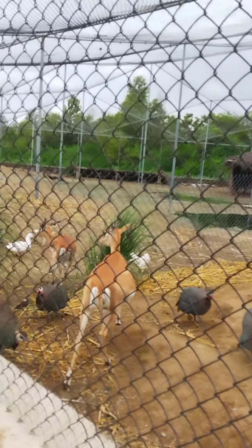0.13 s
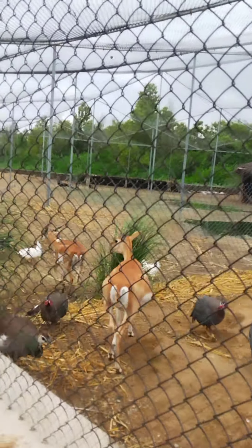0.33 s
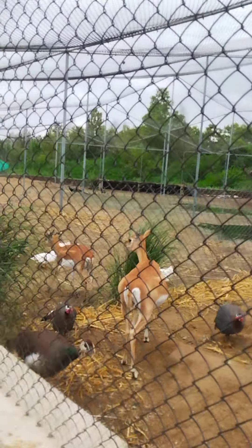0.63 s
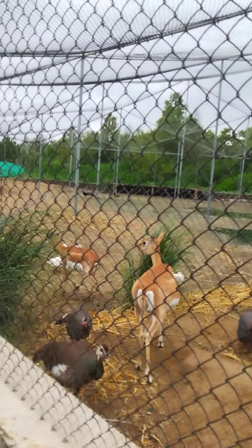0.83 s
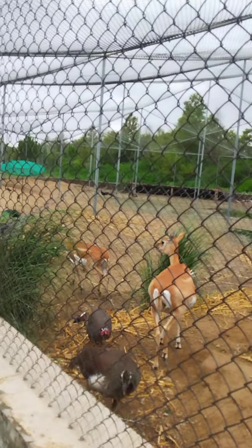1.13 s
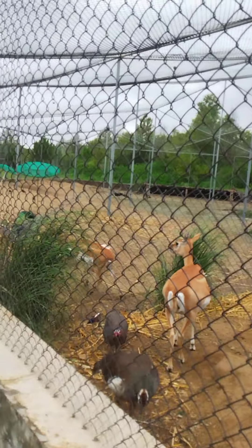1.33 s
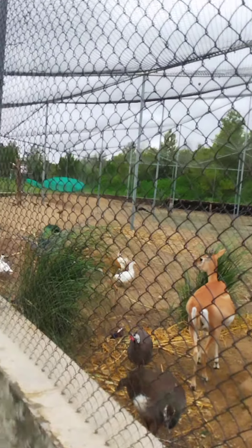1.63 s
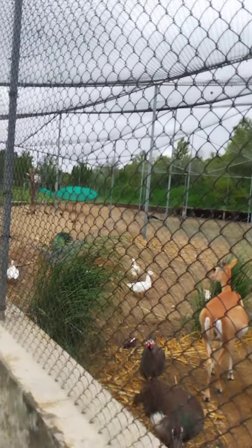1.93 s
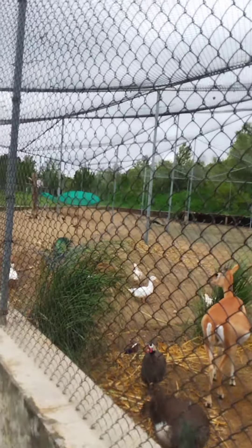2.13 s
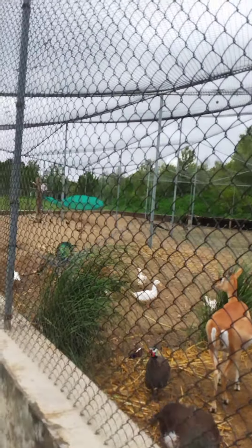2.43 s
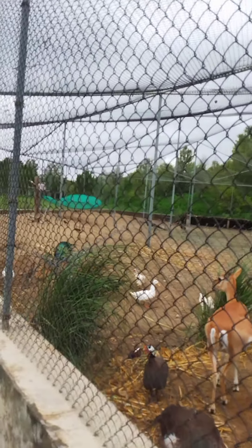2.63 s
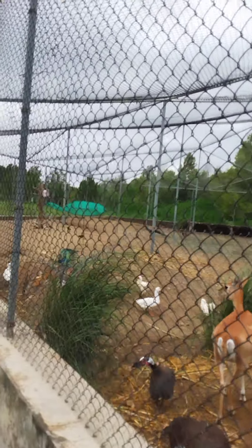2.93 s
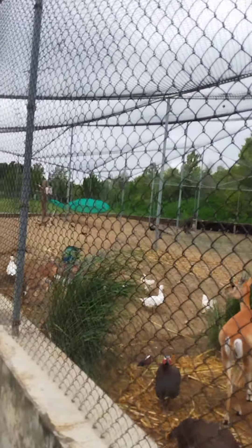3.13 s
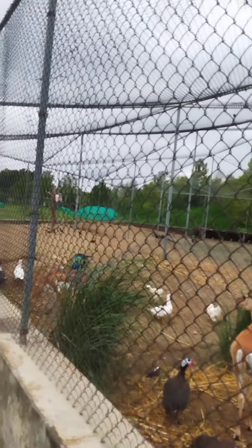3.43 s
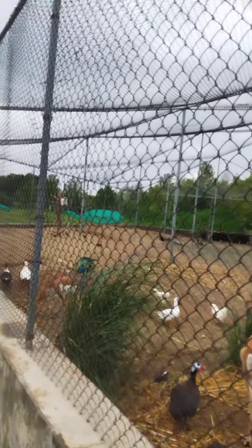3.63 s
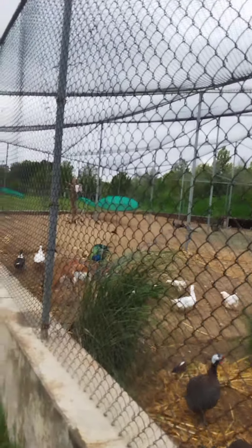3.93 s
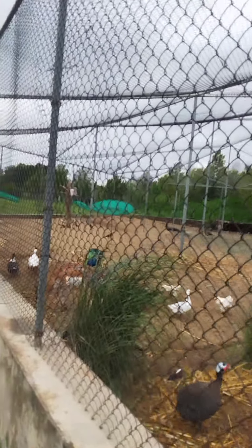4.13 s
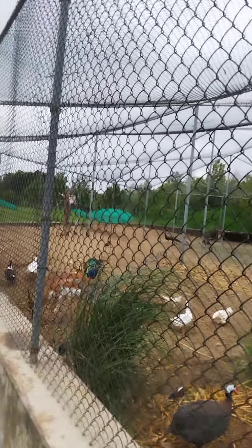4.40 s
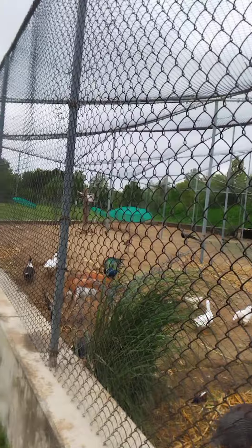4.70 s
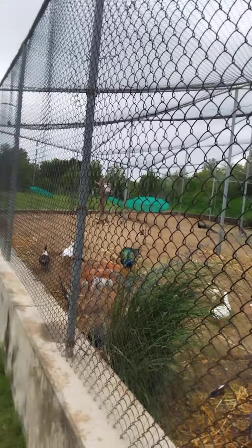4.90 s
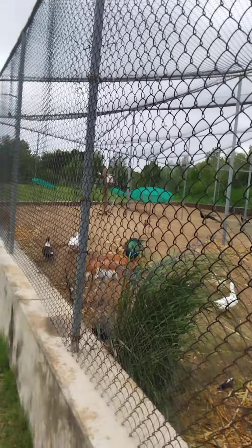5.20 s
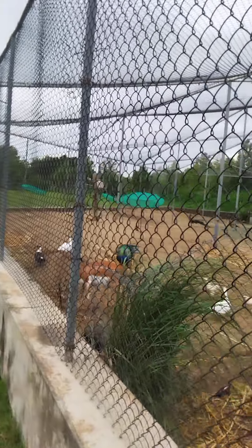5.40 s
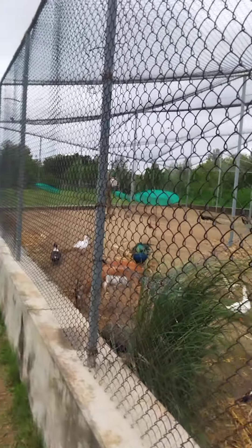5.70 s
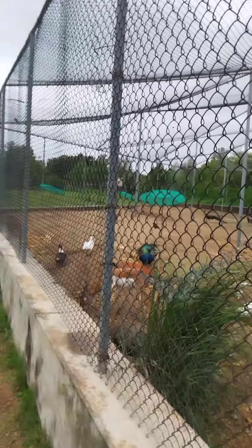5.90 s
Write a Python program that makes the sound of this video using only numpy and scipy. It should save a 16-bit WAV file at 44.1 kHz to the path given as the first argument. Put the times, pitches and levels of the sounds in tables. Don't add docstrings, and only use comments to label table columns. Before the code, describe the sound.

Close guineafowl make short, dry, metallic clucks, sparse at first and clustered after three seconds; from about 4.4 a higher bird rattles evenly, roughly ten notes a second. Wind bumps and flutters separately at the left and right of a handheld microphone throughout, heaviest midway. Faint behind are sliding bird whistles, two duck rasps, one goose honk, a straw rustle and leaf hiss, with a thin open-air echo.

```python
import sys
import numpy as np
from scipy import signal
from scipy.fft import rfft, irfft
from scipy.io import wavfile

SR = 44100
rng = np.random.default_rng(int(sys.argv[2]) if len(sys.argv) > 2 else 0)


def elevation(decibels):
    levels = np.asarray(decibels, float)
    return 10 ** (levels / 20)


def output_pcm(signal):
    pcm = np.clip(np.atleast_2d(signal).T, -1, 1) * 32767
    wavfile.write(sys.argv[1], SR, np.round(pcm).astype(np.int16))


N = 266937

SECOND_HZ = 1094.5
LEAD = .03


def evened(x):
    return x / np.sqrt(np.mean(x ** 2) + 1e-20)


def read(points, hz):
    f, value = np.transpose(points)
    return np.interp(np.log(hz + 1), np.log(f + 1), value)


def columns(rows, t):
    s, *values = np.transpose(rows)
    return np.array([np.interp(t, s, v) for v in values])


def add(mix, s, sound):
    part = mix[..., round(s * SR):][..., :sound.shape[-1]]
    part += sound[..., :part.shape[-1]]


def coloured(x, spectrum):
    size = x.shape[-1]
    return irfft(rfft(x) * elevation(read(spectrum, np.fft.rfftfreq(size, 1 / SR))), size)


def wander(shape, hz):
    pole = np.exp(-2 * np.pi * hz / SR)
    x = rng.standard_normal(shape)
    return evened(signal.lfilter([1], np.convolve([1, -pole], [1, -pole]), x))


def stack(turns, count):
    return evened(np.cos(2 * np.pi * np.arange(1, count + 1)[:, None] * turns).sum(0))


def gusts(rows):
    rise_db_per_s, fall_db_per_s, flutter_steeper, lull_db = 392, 226, 3.4, -63
    t = np.arange(0, N + 64, 64) / SR
    s, length, rumble_db, flutter_db = np.transpose(rows)[:, :, None]
    off_db = rise_db_per_s * np.maximum(s - t, 0) + fall_db_per_s * np.maximum(t - s - length, 0)
    both = elevation([rumble_db - off_db, flutter_db - flutter_steeper * off_db]).max(1)
    both = both + elevation([[lull_db], [lull_db - 31]])
    return np.array([np.interp(np.arange(N) / SR, t, g) for g in both])


def eddy(hz, sharp):
    t = np.arange(1500) / SR
    v = (t - .010) * hz * 2 * np.pi
    slap = (1 - 0.017 * v ** 2) * np.exp(-v ** 2 / 2)
    point = .1 * sharp * np.exp(-5.5 * abs(v))
    ragged = np.gradient(wander(len(t), hz=0.12 * hz))
    steep = signal.butter(3, 2 * hz, fs=SR)
    ragged = evened(signal.lfilter(*steep, ragged))
    flutter = 0.13 * ragged * np.exp(-abs(t - .012) / 0.023)
    return (slap + point + flutter) * signal.windows.tukey(len(t), .2)


def wind():
    # (start [s], length [s], rumble [dB], flutter [dB])
    gusts_left = [(0.0, 0.12, -21, -38), (.27, 0.059, -18.5, -41), (.66, 0.11, -24, -35),
                  (1.0, 0.11, -20, -36), (1.17, 0.29, -17.5, -34.5), (1.56, 0.049, -25.5, -34),
                  (1.8, 0.028, -33, -63), (1.93, 0.1, -31, -70), (2.16, 0.025, -20, -59),
                  (2.36, 0.058, -22, -58), (2.6, 0.18, -24.5, -51), (2.92, 0.023, -26, -63),
                  (3.14, 0.14, -24, -33), (3.38, 0.19, -24, -48), (3.72, 0.22, -18.5, -24),
                  (3.95, 0.422, -16, -16.5), (4.56, 0.14, -26.5, -46), (4.77, 0.098, -21.5, -35.5),
                  (5.08, 0.1, -25, -41), (5.3, 0.027, -30.5, -45), (5.48, 0.048, -34.5, -50),
                  (5.72, 0.04, -25, -37), (5.86, 0.035, -36.5, -58)]
    gusts_right = [(0.0, 0.037, -36, -48), (.17, 0.1, -22.5, -41), (.34, 0.12, -29.5, -50),
                   (.55, 0.099, -14.5, -27.5), (.8, 0.055, -18.5, -39), (.9, 0.1, -21, -33),
                   (1.3, 0.29, -17, -28), (1.56, 0.27, -20, -21.5), (1.85, .28, -20.5, -25.5),
                   (2.16, 0.45, -22, -22.5), (2.47, 0.13, -17.5, -24), (2.7, 0.31, -15.5, -31),
                   (2.92, 0.31, -13.5, -21), (3.1, 0.24, -13, -21), (3.5, 0.53, -19, -24),
                   (3.9, .3, -26, -39), (4.4, 0.1, -15.5, -22), (4.52, .3, -19, -35.5),
                   (5.05, 0.068, -25.5, -36.5), (5.25, 0.023, -29.5, -55), (5.36, 0.043, -22.5, -30),
                   (5.46, 0.31, -24.5, -39), (5.62, 0.014, -17, -29.5), (5.78, 0.046, -23.5, -43),
                   (5.9, 0.038, -27.5, -49)]
    # (time [s], level [dB], sharpness [0-1])
    pops_left = [(1.072, -19.5, 0.06), (1.266, -23, 0.2), (1.298, -17, 0.26), (1.321, -25, 0.23),
                 (1.397, -21, 0.17), (1.454, -19.5, 0.07), (3.815, -25, 0.7), (3.862, -27, 0.9),
                 (3.878, -13.5, 0.6), (3.918, -16, 0.65), (3.933, -17.5, 0.9), (3.958, -27, 1),
                 (3.981, -11.5, 0.36), (4.017, -20, 1), (4.116, -14, 0.46), (4.178, -23.5, 1),
                 (4.242, -24, 0.95), (4.255, -30, 1), (4.27, -13, 0.78), (4.317, -24.5, 0.88),
                 (4.368, -35, 0.9), (4.745, -20, 0)]
    pops_right = [(0.611, -19.5, 0), (0.863, -24.5, 0.19), (1.514, -22.5, 0.64), (1.566, -45, 0.5),
                  (1.589, -18.5, 0.14), (1.625, -13, 0.1), (1.665, -12.5, 0.41), (1.722, -13.5, 0.31),
                  (1.762, -16, 0.28), (1.807, -24.5, 0.26), (1.874, -26, 0.1), (1.895, -18, 0.7),
                  (1.94, -17.5, 0.26), (1.969, -18.5, 0.47), (2.015, -17.5, 0.3), (2.062, -21, 0),
                  (2.077, -26.5, 0.2), (2.099, -17, 0.54), (2.121, -18.5, 0.04), (2.15, -22.5, 0.28),
                  (2.166, -22.5, 0.28), (2.201, -22, 0.18), (2.268, -22, 0.5), (2.288, -16, 0.4),
                  (2.331, -17, 0.26), (2.452, -17, 0.41), (2.511, -18.5, 0.4), (2.602, -21, 0.2),
                  (2.644, -27, 0), (2.656, -17.5, 0.07), (2.811, -24, 0), (2.87, -20.5, 0),
                  (2.928, -37, 0.06), (2.965, -40, 0.38), (3.012, -16, 0.23), (3.064, -20, 0.53),
                  (3.144, -23, 0.7), (3.166, -18, 0.47), (3.362, -31, 0.2), (3.556, -21, 0.07)]
    # (frequency [Hz], level [dB])
    rumble_spectrum = [(15, -97), (40, -10.5), (95, 3.5), (160, -1.5), (260, -9), (400, -24), (700, -104)]
    # (frequency [Hz], level [dB])
    flutter_spectrum = [(120, -31), (250, 0.5), (450, -6), (800, -21), (1300, -36.5), (2500, -43),
                        (5000, -100)]
    pop_db, dull_hz, sharp_hz, pop_lift_db = 15, 312, 856, 9
    level = np.stack([gusts(gusts_left), gusts(gusts_right)], 1).reshape(4, N)
    lumps = 2 * np.tanh(0.13 * wander((2, N), hz=27.2) + 0.82 * wander((2, N), hz=39.0))
    rumble = evened(coloured(rng.standard_normal((2, N)), rumble_spectrum))
    rumble = evened(rumble * elevation(3.63 * lumps))
    swirl = np.zeros((2, N))
    for port, pops in zip(swirl, (pops_left, pops_right)):
        for s, db, sharp in pops:
            add(port, s - .006, np.hanning(700) * np.clip((db + 38) / 20, 0, 1))
    flutter_db = 3.14 * lumps + 3.05 * wander((2, N), hz=59.5) + pop_lift_db * np.minimum(swirl, 1)
    flutter = evened(coloured(rng.standard_normal((2, N)), flutter_spectrum))
    flutter = evened(flutter * elevation(flutter_db))
    out = elevation(1.4) * rumble * level[:2] + elevation(-2.0) * flutter * level[2:]
    for port, pops in zip(out, (pops_left, pops_right)):
        for s, db, sharp in pops:
            sharp = np.clip(sharp, 0, 1)
            hz = dull_hz + (sharp_hz - dull_hz) * sharp
            add(port, s - .008, elevation(db + pop_db) * rng.choice([-1, 1]) * eddy(hz, sharp))
    return out


def leaves():
    # (frequency [Hz], level [dB])
    leaf_spectrum = [(530, -59), (900, 4), (1720, 6.5), (2790, 0), (4460, 3), (4920, 1), (5820, 2.5),
                     (6720, 5.5), (9770, 3.5), (13500, -9), (16000, -36)]
    # (time [s], level [dB])
    leaves_db = [(0.0, -60), (1.5, -59), (2.81, -56), (3.35, -50.5), (4.3, -60.5), (4.72, -49),
                 (5.5, -51.5), (6.05, -54.5)]
    # (time [s], level [dB])
    rustle = [
        (.62, -70),
        (.72, -48),
        (.85, -55),
        (.95, -51),
    ]
    straw_spectrum = [(1500, -13), (6000, -18), (9000, -9), (11000, -26), (15000, -15), (16500, -58)]
    t = np.arange(N) / SR
    hiss_db = columns(leaves_db, t) + 4.0 + 0.6 * wander(N, hz=19.0)
    hiss = evened(coloured(rng.standard_normal((2, N)), leaf_spectrum)) * elevation(hiss_db)
    straw = evened(coloured(rng.standard_normal((2, N)), straw_spectrum))
    present = (t > rustle[0][0]) * (t < rustle[-1][0])
    return hiss + straw * elevation(columns(rustle, t)) * present


def small_bird():
    start_s, every_s, count = -.004, .0872, 27
    low_hz, high_hz, level_db, fade_db_per_s = 5750, 6050, -54, 1
    out, u = np.zeros(N), np.linspace(0, 1, 1000)
    for k in range(count):
        s = max(start_s + k * every_s, 0)
        hz = high_hz if k % 2 else low_hz
        db = level_db - fade_db_per_s * s + 1.5 * rng.standard_normal()
        glide = hz * (1.05 - 0.081 * u + 0.037 * wander(len(u), hz=400))
        add(out, s, elevation(db) * np.sin(np.pi * u) * np.sin(2 * np.pi * np.cumsum(glide) / SR))
    return out


def syllable(length, db, hz0, hz1, rough, peak, pan_db, treble_db, low_db,
             second_hz=SECOND_HZ, second_db=-25, neck=1.02, whistle_db=-15):
    # (frequency [Hz], level [dB])
    throat = [(410, -74), (700, -32), (1010, -10.5), (1200, -17.5), (2100, -5.5), (2360, -10.5),
              (2630, -0.5), (3470, -4), (5360, -2.5), (6370, -10.5), (10400, -9), (11100, -15.5),
              (13900, -44.5), (15400, -5), (16500, -96)]
    t = np.arange(4096) / SR - LEAD
    u = t / length
    after = np.maximum(t, 0)
    rough = np.clip(rough, .35, 1)
    higher = hz0 > 1685
    jitter = wander((3, len(t)), hz=288)
    sag_hz = (hz1 - hz0) * np.clip(u, 0, 1.2) ** 2.1
    onset_hz = (70 + 160 * (1 - rough)) * np.exp(-after / LEAD * 4)
    turns = np.cumsum((hz0 + sag_hz + onset_hz) * (1 + 0.01904 * rough * jitter[0])) / SR
    second = np.cumsum(second_hz * (1 + 0.013 * jitter[1])) / SR
    main = stack(turns, count=9)
    clear = evened(sum(np.cos(2 * np.pi * k * turns) / (1 + max(k - 2, 0)) ** .8 for k in range(1, 10)))
    beats = evened((main + 0.032) * (0.22 + stack(second, count=4)))
    half = (1 + 3 * higher) * np.cos(np.pi * turns)
    quarter = 1.5 * np.cos(np.pi * turns / 2 + rng.random() * 6)
    skips = evened(main * (half + quarter))
    air = evened(rng.standard_normal(len(t)) * (0.34 + np.exp(-(turns % 1) / 0.41)))
    harsh = evened(0.59 * beats + (0.28 + 0.26 * higher) * skips + (1.9 - 0.1 * higher) * air)
    octave = 0.0093 + .42 * higher * np.exp(-np.maximum(u - .1, 0) / 0.2)
    firm = 0.49 * np.exp(-1.2 * higher * np.maximum(u, 0)) * np.cos(2 * np.pi * turns)
    firm = firm + octave * np.cos(4 * np.pi * turns) + 0.074 * higher * np.cos(2 * np.pi * second)
    peak = np.clip(peak, .15, 1 - .15)
    swell_db = -11 * np.where(u < peak, (peak - u) / peak, (u - peak) / (1 - peak)) ** 2
    edges = np.clip((t + 0.0051 - 0.004 * higher) / 0.0013, 0, 1)
    edges = edges * np.exp(-np.maximum(t - length, 0) / 0.0045)
    shape = elevation(swell_db + 2.6 * rough * wander(len(t), hz=57.6)) * edges
    hz = np.fft.rfftfreq(len(t), 1 / SR)
    rough = rough * (1 - .6 * higher * np.exp(-np.maximum(u, 0) / .25))
    source = (np.clip(1 - rough, 0, 1) ** 1.5 * clear + rough * harsh + firm) * shape
    core = np.exp(-((hz - 3100 * neck) / 1100) ** 4)
    thin = elevation(.6 * swell_db) * (t > .001)
    voice = rfft(source) * core + rfft(source * thin) * (1 - core)
    voice = voice * elevation(read(throat, hz / np.clip(neck, .9, 1.25)))
    voice = voice * (1 - .6 * np.exp(-((hz - 6800) / 250) ** 2))
    rise = np.clip(1 + t / .024, 0, 1)
    whistle = wander(len(t), hz=200) * np.sin(2 * np.pi * np.cumsum(1700 + 2300 * rise) / SR)
    whistle = whistle * rise ** 1.8 * np.exp(-after / 0.001)
    voice_rms = np.sqrt(2 * (abs(voice) ** 2).sum() / len(t) / (length * SR))
    voice = voice + rfft(whistle) * elevation(whistle_db) * voice_rms
    delay = rng.uniform(0, .0025, (2, 5, 1)) * [[0], [1], [1], [1], [1]]
    delay = delay + [[[0]], [[.0013 if higher else .00018]]]
    weight = np.array([[1 / .7], [-.6], [.55], [-.45], [.4]]) * [[[1]], [[-1]]]
    ports = voice * (weight * np.exp(-2j * np.pi * hz * delay)).sum(1)
    power = abs(ports) ** 2
    bands = ((1250, 1900), (2300, 9000), (5000, 11000))
    low, body, high = (power[:, (hz > a) & (hz < b)].sum(1, keepdims=True) for a, b in bands)
    ports = ports * (elevation(low_db) * np.sqrt(body / low)) ** np.clip((2300 - hz) / 400, 0, 1)
    ports = ports * (elevation(treble_db) * np.sqrt(body / high)) ** np.clip((hz - 4200) / 1200, 0, 1)
    ports = ports * elevation((second_db + 25) * np.clip((1350 - hz) / 150, 0, 1))
    ports = ports / np.sqrt(2 * body / len(t) / (length * SR))
    return irfft(ports, len(t)) * elevation(db + pan_db / 2 * np.array([[1], [-1]]))


def guineafowl():
    # (start [s], length [s], level [dB], pitch [Hz], roughness [0-1])
    low_bird = [(0.941, 0.035, -17, 1590, 0.53), (1.156, 0.024, -24.5, 1536, 0.41),
                (1.91, 0.024, -32.5, 1453, 0.55), (2.714, 0.013, -27.5, 1479, 0.2),
                (2.893, 0.031, -35, 1540, 0.6), (3.052, 0.046, -18, 1547, 1),
                (3.176, 0.039, -25, 1600, 0.7), (3.28, 0.06, -20.5, 1597, 0.91),
                (3.307, 0.039, -20.5, 1520, 0.38), (3.422, 0.031, -19, 1638, 0.9),
                (3.473, 0.045, -17.5, 1610, 0.59), (3.593, 0.04, -16.5, 1600, 1.02),
                (3.639, 0.028, -32.5, 1530, 0.7), (3.761, 0.044, -16.5, 1615, 1),
                (4.038, 0.0318, -17.5, 1465, 0.21), (4.201, 0.0089, -32.5, 1370, 0.63),
                (4.387, 0.024, -20, 1477, 0.72), (4.561, 0.022, -34, 1402, 0),
                (4.594, 0.021, -19.5, 1508, 0.76), (4.823, 0.021, -18, 1453, 0.51),
                (5.092, 0.041, -21, 1403, 0.95), (5.892, 0.043, -17, 1555, 0.67)]
    low_bill_db = [-7, -11, -4.5, -1, -8, -6.5, -7, -7, -9.5, -10.5, -8, -11.5, -11, -10.5, -10.5, -14, -9,
                   -2, -9, -7, -11, -5.5]
    low_turn_db = [1, -1, 0, -2, 1.5, -1, 3.5, 8, 5, 16, -3, 4.5, 6, 1, -5, 14, 6.5, 2, -4, 0, 13, 3]
    low_throat = [1.05, 1.05, 1.08, 1.02, 1.05, 1.12, 1.05, 1.08, 1.02, 1.1, 1.03, 1.12, 1.02, 1.06, 1.01,
                  0.95, 1.02, 1.02, 0.79, 1.02, 1.1, 1.03]
    # (start [s], length [s], level [dB], pitch [Hz], place of the peak [0-1])
    high_bird = [(4.008, 0.035, -27.5, 1600, 0.95), (4.367, 0.05, -18, 1745, 0.46),
                 (4.508, 0.04, -17.5, 1727, 0.33), (4.62, 0.041, -16, 1730, 0.63),
                 (4.725, 0.041, -16.5, 1746, 0.58), (4.826, 0.04, -15.5, 1700, 0.64),
                 (4.917, 0.039, -18.5, 1710, 0.56), (5.011, 0.043, -15, 1708, 0.17),
                 (5.106, 0.036, -18.5, 1743, 0.44), (5.192, 0.035, -14, 1709, 0.17),
                 (5.284, 0.036, -15.5, 1759, 0), (5.374, 0.035, -17.5, 1735, 0.25),
                 (5.476, 0.039, -19, 1715, 0), (5.575, 0.045, -21, 1724, 0.26),
                 (5.676, 0.044, -25, 1715, 0.1)]
    # (left minus right [dB], treble [dB], second membrane [dB])
    high_bill = [(-1, -5.5, -40), (0, -4.5, -36), (7, -7.5, -31), (2.5, -7.5, -33), (4.5, -8.5, -34),
                 (2.5, -8.5, -34), (4, -7.5, -27), (2.5, -6, -26), (0.5, -7, -31), (0.5, -7, -29.5),
                 (-0.5, -5.5, -32), (3, -7, -21.5), (4, -4.5, -31), (4.5, -6, -21), (1, -5, -26)]
    # (resonance shift [ratio], whistle [dB])
    high_throat = [(1.038, -19), (1.02, -10), (1.01, -7), (1.05, -26), (0.997, -14), (1.044, -20),
                   (1.08, -28), (1.02, -30), (1.05, -25), (1.025, -27), (1.023, -35), (1.04, -31),
                   (1.016, -30), (1.04, -32), (1.02, -27)]
    # (start [s], length [s], level [dB], pitch [Hz], roughness [0-1])
    clucks = [
        (0.213, 0.02, -52.5, 1440, 0.2),
        (1.976, 0.09, -57.5, 1410, 0.77),
        (2.205, 0.059, -49, 1516, 1),
        (2.377, 0.028, -29, 1762, 0.44),
        (4.475, 0.013, -39.5, 1410, 1.06),
        (5.795, 0.017, -30.5, 1172, .3),
        (0.664, 0.036, -55, 1235, 0.54),
    ]
    # (sag [Hz/s], place of the peak [0-1], left minus right [dB], treble [dB], fundamental [dB])
    cluck_bills = [(8998, 0.9, -5, -35, -8), (4, 0.1, 12, -5, -15), (0, 0, 6, -9, -4),
                   (2000, 0.68, 1.5, -1.5, -8), (0, 0.5, 3, -4, -19), (-32000, 0.4, 5, -11, -24),
                   (600, 0.3, 1, -27, -15)]
    out = np.zeros((2, N))
    end_hz, end_rough_hz, fastest_hz_per_s = 1263, 152, 6000
    for (s, length, db, hz, rough), treble_db, pan_db, neck in zip(low_bird, low_bill_db, low_turn_db, low_throat):
        sag = min((hz - end_hz - end_rough_hz * rough) / length, fastest_hz_per_s)
        low_db = -19.5 + 1.28 * s + 4.5 * (1 - rough)
        voice = syllable(length, db, hz, hz - sag * length, rough, 0.53, pan_db, treble_db, low_db, neck=neck)
        add(out, s - LEAD, voice)
    high_sag, high_rough, high_low_db = 1700, 0.99, -11.5
    for (s, length, db, hz, peak), (pan_db, treble_db, second_db), air in zip(high_bird, high_bill, high_throat):
        second_hz = SECOND_HZ + 170 * (s - 5.6)
        voice = syllable(length, db, hz, hz - high_sag * length, high_rough, peak, pan_db, treble_db,
                         high_low_db, second_hz, second_db, *air)
        add(out, s - LEAD, voice)
    for (s, length, db, hz, rough), (sag, *bill) in zip(clucks, cluck_bills):
        add(out, s - LEAD, syllable(length, db, hz, hz - sag * length, rough, *bill))
    return out


def faint_clucks():
    # (start [s], length [s], level [dB], pitch [Hz], treble [dB])
    faint = [
        (3.043, .005, -40, 1500, 6),
        (3.96, .012, -44, 1300, -20),
        (4.89, .012, -42, 1520, -14),
        (0.72, .02, -52, 1500, -14),
    ]
    out = np.zeros((2, N))
    for s, length, db, hz, treble_db in faint:
        add(out, s - LEAD, syllable(length, db, hz, hz, 0.39, 0.68, 1, treble_db, -1))
    return out


def waterfowl():
    # (time [s], level [dB], pulse rate [Hz])
    rasps = [
        [(1.5, -68, 96.9), (1.6, -54, 102.4), (1.75, -50.5, 114.7), (1.85, -52, 103), (1.92, -69, 103.3)],
        [(2.14, -76, 103), (2.24, -53, 107.8), (2.4, -45.5, 115.7), (2.52, -50.5, 109), (2.64, -67, 102)],
    ]
    # (frequency [Hz], width [Hz], level [dB])
    bill_modes = [(1010, 170, -28), (1480, 300, -1.5), (1784, 260, 2), (2214, 190, -1.5)]
    # (time [s], pitch [Hz], level [dB])
    honk_curve = [
        (3.12, 200, -64),
        (3.2, 222, -55),
        (3.3, 212, -55),
    ]
    # (multiple of the pitch [ratio], level [dB])
    honk_partials = [(4, 8), (5, -2), (6, -39), (7, -7), (8, -8), (9, -16)]
    out = np.zeros(N)
    for rows in rasps:
        t = np.arange(rows[0][0], rows[-1][0], 1 / SR)
        db, rate = columns(rows, t)
        turns = np.cumsum(rate * (1 + 0.0303 * wander(len(t), hz=41.6))) / SR
        breath = 5.8 * rng.standard_normal(len(t)) * np.exp(-(turns % 1) / .5)
        drive = stack(turns, count=26) + breath
        hz = np.fft.rfftfreq(len(t), 1 / SR)
        bill = sum(elevation(g) / (1 + (2 * (hz - f) / w) ** 4) for f, w, g in bill_modes)
        add(out, t[0], elevation(db) * evened(irfft(rfft(drive) * bill, len(t))))
    t = np.arange(honk_curve[0][0], honk_curve[-1][0], 1 / SR)
    pitch, db = columns(honk_curve, t)
    wobble = 1 + 0.014 * wander(len(t), hz=49.7)
    turns = np.cumsum(pitch * wobble) / SR
    honk = sum(elevation(g) * np.sin(2 * np.pi * k * turns) for k, g in honk_partials)
    level = elevation(db + 10.0 + 3 * (wobble - 1) / 0.018)
    add(out, t[0], level * honk * signal.windows.tukey(len(t), .2))
    return out


def snaps():
    # (time [s], level [dB])
    snap_times = [(1.514, -20), (1.592, -32), (1.724, -26), (1.764, -32), (1.897, -29), (2.099, -31),
                  (2.27, -32), (2.29, -29), (2.465, -32), (2.658, -39)]
    out, t = np.zeros((2, N)), np.arange(-100, 100) / SR
    for s, db in snap_times:
        add(out[1], s + t[0], elevation(db) * np.exp(-abs(t) / .00012))
    return out


def pen(x):
    # (frequency [Hz], time to fall 60 dB [s])
    decay = [(500, 0.33), (2000, 1), (6000, 0.84), (12000, 0.73)]
    taps = np.zeros((2, SR))
    at = np.arange(300, SR - 20, 20) + rng.integers(0, 20, (2, (SR - 301) // 20))
    np.put_along_axis(taps, at, rng.choice([-1., 1.], at.shape), 1)
    hz, t, z = signal.stft(taps, SR, nperseg=256)
    tail = signal.istft(z * elevation(-60 * t / read(decay, hz)[:, None]), SR, nperseg=256)[1]
    return signal.fftconvolve(x, tail / np.linalg.norm(tail[0]), axes=1)[:, :N]


def scene():
    # (frequency [Hz], level [dB])
    echo_colour = [(1500, 2), (4000, -6.5), (6500, 3), (10000, 3), (14000, -2)]
    near = guineafowl()
    far = waterfowl() * elevation([[2.5], [-2.5]]) + small_bird() * elevation([[1.5], [-1.5]])
    scattered = near * wander((2, N), hz=930)
    echo = pen(elevation(-20.5) * coloured(scattered, echo_colour) + elevation(-22) * far[::-1])
    return near + far + echo + leaves() + wind() + faint_clucks() + snaps()


def top_cut(x):
    return signal.sosfilt(signal.butter(12, 16780, fs=SR, output="sos"), x)


def record(dry):
    ceiling = 1.1
    dry = signal.lfilter(*signal.butter(2, 38, "high", fs=SR), dry)
    held = ceiling * np.tanh(dry / ceiling)
    held = signal.oaconvolve(held, signal.firwin(255, 15700, fs=SR)[None], "same")
    return top_cut(held)


dry = scene()
out = record(dry)
output_pcm(out)
```